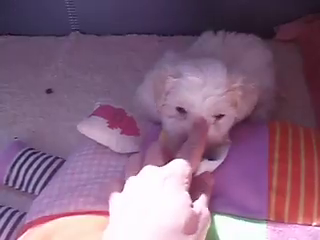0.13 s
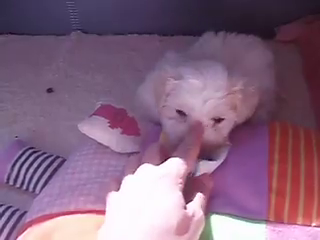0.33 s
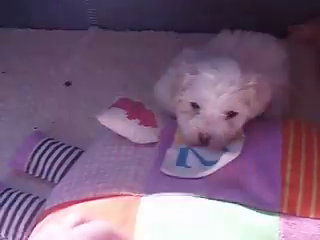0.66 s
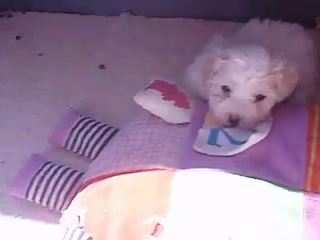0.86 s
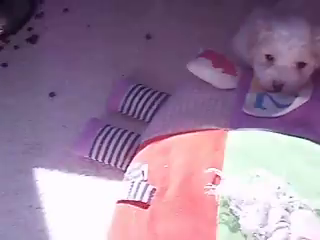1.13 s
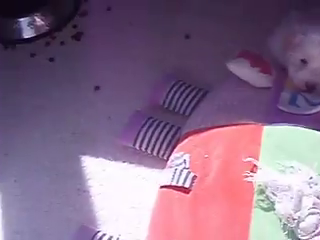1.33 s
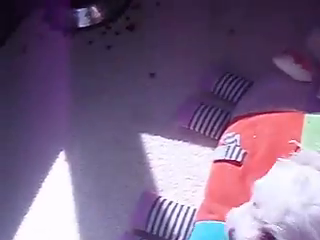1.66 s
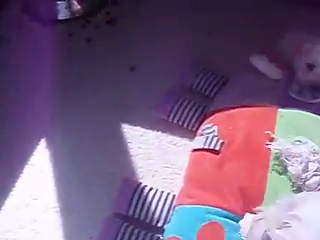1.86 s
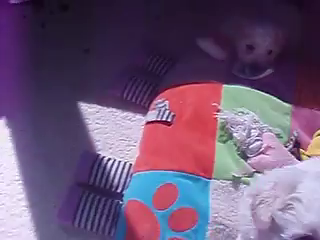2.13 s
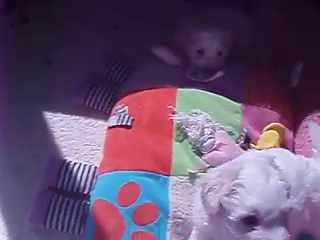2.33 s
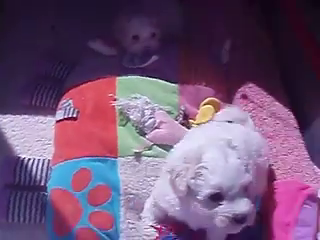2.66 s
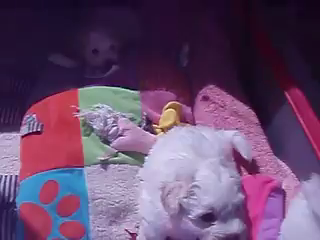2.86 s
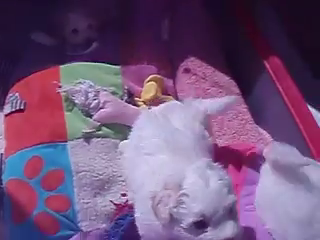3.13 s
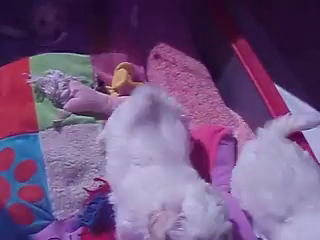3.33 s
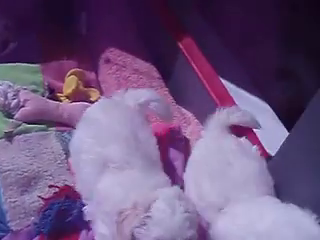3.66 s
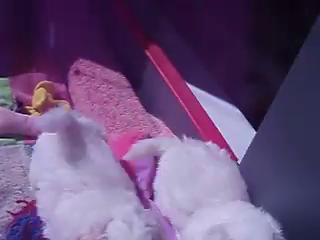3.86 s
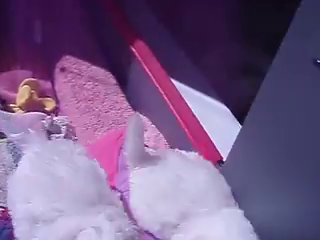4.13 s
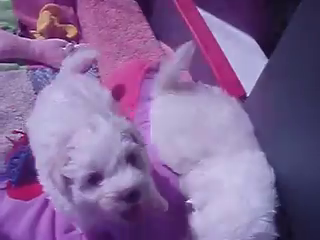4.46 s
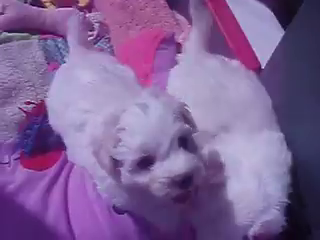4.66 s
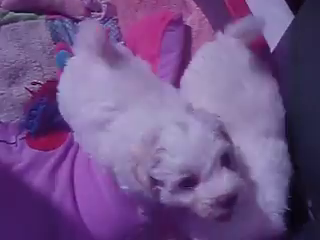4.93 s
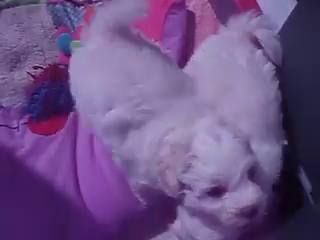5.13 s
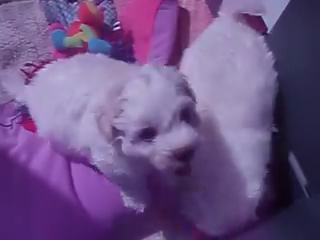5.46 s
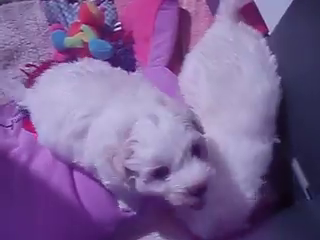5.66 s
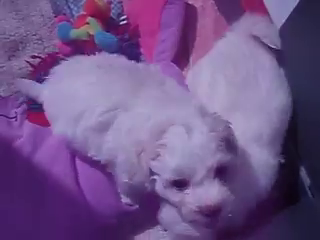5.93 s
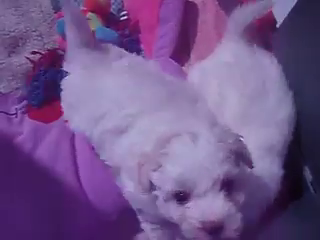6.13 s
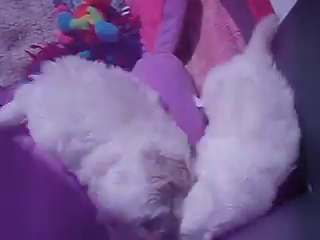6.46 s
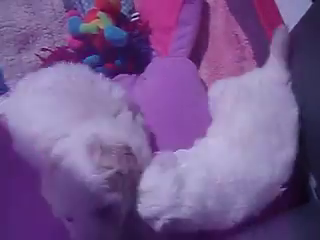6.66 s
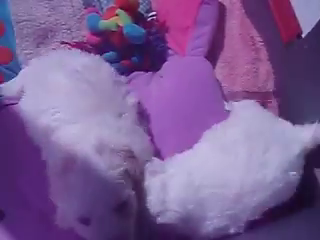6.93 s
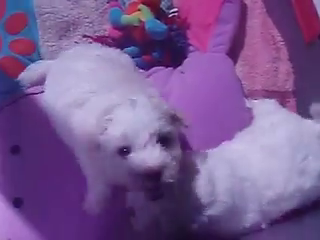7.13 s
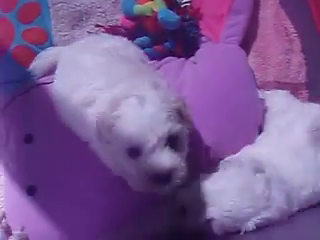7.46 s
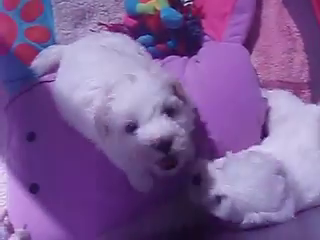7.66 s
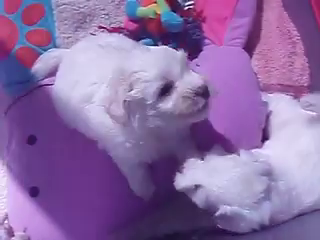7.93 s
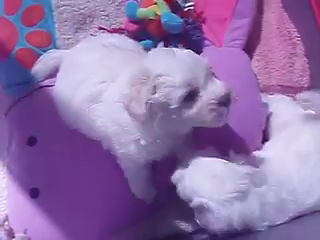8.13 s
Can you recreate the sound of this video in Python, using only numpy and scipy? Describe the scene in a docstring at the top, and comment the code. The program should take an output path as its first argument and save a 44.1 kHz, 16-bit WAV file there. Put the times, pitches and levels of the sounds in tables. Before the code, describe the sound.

A small camera with narrow, telephone-like sound sits close to puppies on fleece bedding indoors. Constant soft hiss lies under a rapid electronic tick, about thirty per second, in runs of roughly two thirds of a second with short gaps. From 0 to 1.2 s, faint fur strokes and tiny claw clicks; at 1.7 s one sharp, ringing snap. Sparse brushing follows until about 3.2 s, when rustles and scratches thicken, with crisp snags around 3.5 and a cluster at 5.0. From 6 to 7 s the shuffling is strongest, with dull paw thumps near 6.5 and 6.9 and a dense scratchy burst at 7.0. At about 7.15 s a puppy sneezes: a loud, gusty, distorted burst about 0.15 s long, with a squeaky high yip inside and a faint short room tail. Light scratching lasts to 7.8, then soft thumps at 8.0 and mostly hiss and ticking to the end.

```python
"""Puppies on fleece, and one sneeze

Puppies shuffle and scratch on fleece bedding close to a small camera; one sneezes out a short loud yip.
Fur and paws are filtered noise and clicks, claws and thumps damped rings; the sneeze is gusts of
filtered noise over gliding overtones. The microphone port rings near 3.6 kHz; the camera adds hiss and
a tick on every frame it stores, keeps only a narrow band and clips the loudest peaks.
"""
import sys
import numpy as np
from scipy import signal
from scipy.fft import rfft, irfft
from scipy.io import wavfile
from scipy.ndimage import uniform_filter1d

SR = 44100
rng = np.random.default_rng(int(sys.argv[2]) if len(sys.argv) > 2 else 0)


def master_out(mix):
    """Clip the mix to full scale and print it as 16-bit PCM to the path in sys.argv[1]."""
    frames = np.transpose(np.atleast_2d(mix))
    ceiling = np.clip(frames, -1, 1)
    pcm = np.round(ceiling * 32767).astype(np.int16)
    wavfile.write(sys.argv[1], SR, pcm)


N = 365588
T = np.arange(N) / SR

# strokes of paws and fur over cloth: t/s at the peak, level/dB, length/s, lower body relative to the top/dB
STROKES = [(0.057, -45.5, 0.29, -3.5), (0.462, -49.5, 0.17, -2), (0.619, -41.5, 0.25, -23),
           (0.769, -37.5, 0.054, -10), (0.965, -43, 0.099, -19), (1.195, -50.5, 0.25, -15),
           (1.845, -48, 0.072, -6), (2.039, -53.5, 0.07, 7), (2.304, -47, 0.094, -13),
           (2.495, -47, 0.045, 2), (2.669, -49, 0.051, -14), (2.797, -50.5, 0.092, -11),
           (3.1, -44, 0.064, -16), (3.273, -35.5, 0.089, -27), (3.354, -34.5, 0.046, -12),
           (3.537, -41, 0.11, -18), (3.626, -38, 0.11, -19), (3.771, -42, 0.15, -18),
           (3.995, -33.5, 0.11, -14), (4.282, -43.5, 0.091, -13), (4.51, -46, 0.055, -10),
           (4.665, -37.5, 0.074, -10), (4.817, -39, 0.15, -28), (4.976, -45.5, .05, 3),
           (5.051, -33.5, 0.15, -21), (5.148, -35.5, 0.088, -18), (5.226, -33, .1, -15),
           (5.436, -46.5, .13, -1.5), (5.658, -41, 0.095, -12), (5.895, -42.5, 0.075, -11),
           (6.046, -32, 0.16, -18), (6.178, -33, 0.1, -3), (6.321, -35.5, 0.11, -3.5),
           (6.466, -37.5, .11, -4), (6.635, -36, 0.3, -9), (6.777, -35.5, 0.063, -15),
           (6.855, -39, 0.13, -20), (7.013, -33.5, 0.22, -10.5), (7.3, -37, 0.12, -15),
           (7.49, -37, 0.14, -24), (7.59, -40.5, 0.19, -18)]


def undb(db):
    """Decibels to an amplitude factor."""
    return 10 ** (np.asarray(db) / 20)


def unit(x):
    """Scale to an RMS of 1."""
    return x / np.sqrt(np.mean(x ** 2))


def band(x, hz, width_hz):
    """Resonance with gain 1 at the centre."""
    return signal.lfilter(*signal.iirpeak(hz, hz / width_hz, SR), x)


def walk(rate):
    """Random levels, one every 1 / rate s, joined by straight slopes; RMS near 1."""
    k = int(SR / rate)
    steps = np.repeat(rng.standard_normal(N // k + 1), k)
    return unit(uniform_filter1d(steps, k)[:N])


def add(out, s, sound):
    """Mix a short sound in at a time in seconds."""
    i = int(s * SR)
    out[i:i + len(sound)] += sound[:N - i]


def ring(hz, t60, rise_s):
    """One damped mode with a short rise, peak 1."""
    t = np.arange(int(t60 * SR)) / SR
    x = np.sin(2 * np.pi * hz * t) * (1 - np.exp(-t / rise_s)) * 1000. ** (-t / t60)
    return x / np.abs(x).max()


def frame_jumps():
    """Supply current jumps up and back on each frame, every third stored one lighter."""
    # runs of stored frames: first frame, last frame
    storing = [(3, 21), (32, 52), (63, 81), (93, 112), (122, 142), (152, 172), (182, 201), (212, 232),
               (243, 260)]
    frame_hz, start_s, pulse_s, step = 30 / 1.001, .03235, .00134, .033
    third_db = -4.0
    idle = -.13  # frames outside the runs jump faintly the other way
    jumps = np.zeros(N + SR)
    frame = np.arange(int(N / SR * frame_hz))
    busy = sum((frame >= a) & (frame <= b) for a, b in storing)
    stored = undb(third_db * (frame % 3 == 0) + 0.18 * rng.standard_normal(len(frame)))
    size = step * np.where(busy, stored, idle)
    at = start_s + frame / frame_hz
    jumps[np.round(at * SR).astype(int)] += size
    jumps[np.round((at + pulse_s) * SR).astype(int)] -= size
    return jumps


def screen_jumps():
    """Supply current steps through the same small pattern in each screen cycle."""
    # steps of one screen cycle: t/s into the cycle, step/amplitude
    screen_steps = [(.0026, .002), (.0089, .003), (.0095, -.003), (.0163, .0045), (.0172, .0065),
                    (.0224, -.009), (.0233, .0035), (.0244, .0025)]
    screen_hz = 29.992
    jumps = np.zeros(N + SR)
    cycle = np.arange(int(N / SR * screen_hz) + 1) / screen_hz
    for s, jump in screen_steps:
        jumps[np.round((cycle + s) * SR).astype(int)] += jump
    return jumps


def camera_hiss():
    """Steady electronic hiss: white noise shaped over frequency."""
    # hiss spectrum: f/Hz, relative density/dB
    hiss_curve = [(30, -14.5), (90, -4), (200, -3.5), (500, -5), (1000, -8), (2000, -10), (3500, -11.5),
                  (4500, -19)]
    hiss_db = -47.5
    hz, db = np.transpose(hiss_curve)
    f = np.arange(N // 2 + 1) * SR / N + 1  # 1 Hz up, to keep the logarithm finite
    shape = undb(np.interp(np.log(f), np.log(hz), db))
    hiss = irfft(rfft(rng.standard_normal(N)) * shape, N)
    return undb(hiss_db) * unit(hiss)


def camera():
    """Current jumps pass two coupling capacitors and tick, over the steady hiss."""
    # time constants of the coupling capacitors: t/s
    settle_s = [.00057, .0018]
    ticks = np.cumsum((frame_jumps() + screen_jumps())[:N])
    # each capacitor is a high-pass: a jump settles back and undershoots a little
    for tau in settle_s:
        ticks = signal.lfilter([1, -1], [1, -np.exp(-1 / (tau * SR))], ticks)
    return ticks + camera_hiss()


def shuffle():
    """Fibres slip in dense tiny clicks over a swish; the port rings them, the quilt gives a lower body."""
    slips_per_s, scatter_db, flutter_db = 2000, 3.5, 1.7
    rest_db, rest_body_db = -56, -59.5  # fur stirring between strokes
    rise_share = 0.52  # part of a stroke's length ahead of its peak
    edge_db, roundness = 12, 1.19  # fall from the peak to either end of the length, and its curve
    port_hz, port_width_hz = 3650, 700

    top_power, body_power = undb(2 * rest_db), undb(2 * rest_body_db)
    for s, db, length, body_db in STROKES:
        away = np.maximum((s - T) / rise_share, (T - s) / (1 - rise_share)) / length
        power = undb(2 * (db - edge_db * away ** roundness))
        top_power = top_power + power
        body_power = body_power + power * undb(2 * body_db)

    strength = undb(scatter_db * np.minimum(rng.exponential(size=N), 3))
    slips = (rng.random(N) < slips_per_s / SR) * rng.standard_normal(N) * strength
    swish = 0.34 * rng.standard_normal(N)
    fibres = (unit(slips) + swish) * undb(flutter_db * walk(90))
    top = unit(band(fibres, port_hz, port_width_hz) + .5 * band(fibres, 2960, 1500))
    upper_body = band(band(fibres, 2010, 2400), 2100, 2500)
    body = unit(upper_body + band(fibres, 820, 740))
    return np.sqrt(top_power) * top + np.sqrt(body_power) * body


def light_snags():
    """Lighter claw catches, at random around the strokes, as rows of t/s, level/dB, f/Hz, t60/s."""
    per_s, level_db, scatter_db = 9, -37, 1.5
    port_hz, spread_hz, t60 = 3580, 110, .0045
    draw = rng.standard_normal((int(per_s * N / SR), 2))
    stroke = np.array(STROKES)[rng.integers(len(STROKES), size=len(draw))]
    when = np.abs(stroke[:, 0] + stroke[:, 2] * rng.uniform(-1.1, 1, len(draw)))
    level = level_db + scatter_db * draw[:, 0]
    hz = port_hz + spread_hz * draw[:, 1]
    return np.transpose([when, level, hz, np.full(len(draw), t60)])


def claws():
    """A claw snaps off a thread: a broad click that rings briefly, crisper when short."""
    # the clearest claws catching the cloth: t/s, level/dB, ring f/Hz, ring t60/s
    clear_catches = [(0.0625, -33, 3500, 0.006), (0.0707, -33, 2880, 0.0042), (0.173, -31.5, 3770, 0.0077),
                     (0.304, -36.5, 3780, 0.0067), (0.39, -35.5, 3440, 0.006), (0.4416, -35, 3560, 0.0055),
                     (0.4803, -32, 3540, 0.0068), (0.5342, -30, 3620, 0.006), (0.775, -31.5, 3470, 0.0055),
                     (0.795, -30, 3450, 0.0086), (1.191, -32, 3700, 0.0071), (1.6944, -19.5, 3680, 0.018),
                     (1.8592, -30, 3740, 0.0098), (2.053, -34.5, 3510, 0.0069), (2.261, -27, 3540, 0.0069),
                     (2.3114, -30.5, 3630, 0.0068), (2.6686, -27, 3550, 0.0067),
                     (2.7931, -30.5, 2720, 0.005), (3.235, -30, 3590, 0.006), (3.2829, -31, 3660, 0.006),
                     (3.3732, -27, 3440, 0.0091), (3.4116, -28.5, 3070, 0.0047),
                     (3.5107, -22.5, 3670, 0.0069), (3.5801, -24, 3780, 0.006),
                     (3.691, -31.5, 3710, 0.0054), (3.8142, -30, 3780, 0.006), (3.8931, -32.5, 3430, 0.006),
                     (3.9285, -33, 3680, 0.006), (4.0791, -25, 3660, 0.0072), (4.6232, -28, 3420, 0.0064),
                     (4.6453, -29, 3750, 0.006), (4.7728, -31, 3500, 0.0053), (4.9392, -27, 3800, 0.0043),
                     (4.994, -18, 3400, 0.0071), (5.0001, -19.5, 3800, 0.0056), (5.0567, -20, 3820, 0.007),
                     (5.0618, -21, 3740, 0.0074), (5.1404, -33, 3540, 0.006), (5.409, -33, 3500, 0.0055),
                     (5.967, -31.5, 3520, 0.006), (6.0502, -23, 3700, 0.006), (6.0774, -29, 3610, 0.0055),
                     (6.1424, -26, 3780, 0.006), (6.1927, -17.5, 3600, 0.006),
                     (6.2647, -28.5, 3700, 0.0056), (6.306, -21.5, 3700, 0.006),
                     (6.3146, -23, 3770, 0.0074), (6.4413, -25.5, 3500, 0.006), (6.6194, -29, 3570, 0.0076),
                     (6.6628, -26, 3440, 0.006), (6.757, -23, 3800, 0.0053), (6.7689, -20.5, 3620, 0.0054),
                     (6.821, -22.5, 3700, 0.006), (6.881, -24, 3580, 0.0074), (6.9944, -15, 3730, 0.0071),
                     (7.001, -16.5, 3530, 0.006), (7.0118, -16, 3810, 0.006), (7.0269, -20, 3280, 0.006),
                     (7.036, -22, 3540, 0.006), (7.1362, -23, 3800, 0.006), (7.4903, -24.5, 3610, 0.0077),
                     (7.5009, -22.5, 3550, 0.0088), (7.5784, -28, 3560, 0.0067),
                     (7.8093, -30, 3600, 0.0054)]
    crisp_t60 = .007  # s; the click is as strong as the ring at this decay
    body_db, body_spread_db = -31.5, 18.5
    out = np.zeros(N)
    catches = np.vstack([clear_catches, light_snags()])
    for (s, db, hz, t60), (b, c) in zip(catches, rng.random((len(catches), 2))):
        add(out, s, undb(db) * ring(hz, t60, 0.0007))
        add(out, s, undb(db) * crisp_t60 / t60 * ring(3400, .0025, .0001))  # click
        cloth = ring(1500 + 700 * b, 0.0059, 0.00036)
        add(out, s, undb(db + body_db + body_spread_db * c) * cloth)
    return out


def thumps():
    """A paw lands on the bedding with a dull, low damped ring."""
    # soft paw thumps: t/s, level/dB, ring f/Hz, t60/s
    landings = [(6.483, -29.5, 353, 0.011), (6.535, -33, 245, 0.034), (6.921, -31, 258, 0.035),
                (7.168, -36, 410, 0.03), (8.004, -40, 390, 0.048), (8.039, -35.5, 252, 0.039)]
    out = np.zeros(N)
    for s, db, hz, t60 in landings:
        add(out, s, undb(db) * ring(hz, t60, 0.00016))
    return out


def sneeze_gusts(mouth_hz):
    """Turbulent gusts whistle in the nose and ring mouth and throat."""
    # gusts: t/s, level/dB, hold/s, whistle f/Hz, mouth relative/dB, throat relative/dB
    gusts = [(6.993, -25.5, 0.014, 3760, -0.5, -4), (7.008, -32.5, .01, 3500, -20, -4),
             (7.031, -30, .0085, 3500, -5, -7), (7.154, -8, 0.0054, 3840, -22, -39),
             (7.163, -8, .011, 3520, -4, -11), (7.179, -10.5, 0.0083, 3370, -10.5, -33),
             (7.193, -12.5, 0.013, 3740, -31, -28), (7.208, -15.5, 0.027, 3506, -7, -30),
             (7.249, -8.5, .0022, 3670, -10, -27), (7.259, -16.5, 0.0022, 3660, -30.5, -28.5)]
    # throat resonances: f/Hz, width/Hz, level/dB
    throat_modes = [(150, 260, -9), (512, 730, -3.5), (1105, 570, 4), (1760, 490, 7.5)]
    rise_s, t60 = 0.0023, 0.035
    air = rng.standard_normal(N) * undb(0.75 * walk(300))
    throat = unit(sum(undb(db) * band(band(air, hz, w), hz, 2 * w) for hz, w, db in throat_modes))
    mouth = unit(band(band(air, mouth_hz, 400), mouth_hz, 1500))
    out = np.zeros(N)
    for s, db, hold, hz, mouth_db, throat_db in gusts:
        t = T - s
        rise = np.clip(t / rise_s, 0, 1) ** 2
        fade = 1000. ** (-np.clip(t - rise_s - hold, 0, 1) / t60)
        nose = unit(band(band(air, hz, 350), hz, 900) + .25 * band(air, 3200, 1200))
        out += undb(db) * rise * fade * (nose + undb(mouth_db) * mouth + undb(throat_db) * throat)
    return out


def yip(mouth_hz):
    """Nearly steady glottal cycles give overtones, each wavering on its own."""
    # the voice inside the sneeze: t/s, pitch f/Hz, effort/dB
    voice = [(7.203, 605, -55), (7.208, 613, -28), (7.216, 617, -22), (7.222, 633, -23), (7.233, 645, -26),
             (7.241, 636, -34), (7.247, 628, -39), (7.27, 628, -41), (7.295, 640, -58)]
    # overtones: multiple of the pitch, level relative to the effort/dB, drift/(dB/s)
    overtones = [(1, 2, -250), (2, 4.5, -150), (3, 3.5, -52), (4, 15.5, 31), (5, -1, 32.5), (6, -4, 27)]
    hoarse_db, mouth_width_hz = 2, 85
    s, hz, db = np.transpose(voice)
    pitch = np.interp(T, s, hz) * (1 + 0.0022 * walk(290))
    phase = 2 * np.pi * np.cumsum(pitch) / SR
    effort_db = np.interp(T, s, db, left=-120, right=-120)
    elapsed = np.clip(T - s[0], 0, s[-1] - s[0])
    out = np.zeros(N)
    for k, k_db, drift in overtones:
        colour_db = k_db + drift * elapsed + hoarse_db * walk(250)
        # weaker effort loses the higher overtones first
        dulling_db = .12 * (k - 1) * (effort_db - db.max())
        gain = undb(effort_db + colour_db + dulling_db)
        # the fourth swells as it glides into the mouth resonance
        tuned = 1 / np.hypot(1, 2 * (k * pitch - mouth_hz) / mouth_width_hz) if k == 4 else 1
        out += gain * tuned * np.sin(k * phase)
    return out


def sneeze():
    """Gusts and voice share the mouth resonance, and the room rings on a little."""
    mouth_hz = 2570
    echo_db, echo_t60 = -25.5, 0.17
    out = sneeze_gusts(mouth_hz) + yip(mouth_hz)
    t = np.arange(int(echo_t60 * SR)) / SR
    echo = rng.standard_normal(len(t)) * 1000. ** (-t / echo_t60)
    return out + undb(echo_db) * signal.fftconvolve(out, echo / np.linalg.norm(echo))[:N]


def scene():
    """Camera noise, fur on cloth, claws and paws, and the sneeze, on one channel."""
    return (camera() + shuffle() + claws() + thumps() + sneeze())[None]


def record(dry):
    """A narrow voice band, hard clipping of the loudest peaks, a small offset and the top cut."""
    voice_band_hz, roll_hz, top_hz = 4262, 3777, 15900
    clip, offset = .71, -0.0029
    narrow = signal.sosfilt(signal.ellip(9, .5, 85, voice_band_hz, fs=SR, output="sos"), dry)
    narrow = signal.sosfilt(signal.butter(8, roll_hz, fs=SR, output="sos"), narrow)
    clipped = np.clip(narrow, -clip, clip) + offset
    return signal.sosfilt(signal.ellip(8, .2, 70, top_hz, fs=SR, output="sos"), clipped)


dry = scene()
out = record(dry)
master_out(out)
```